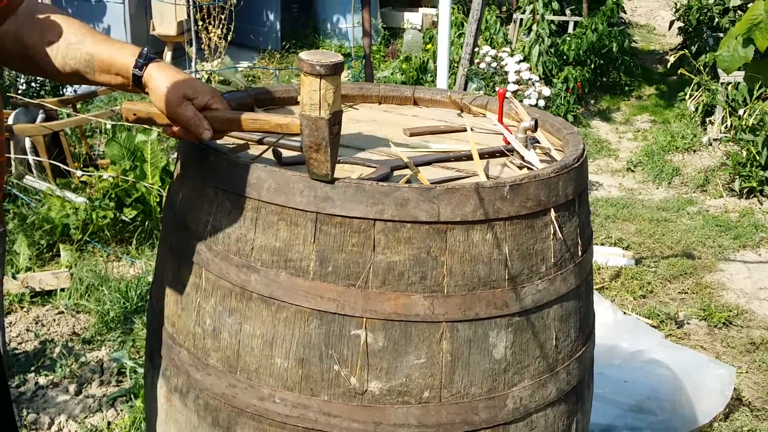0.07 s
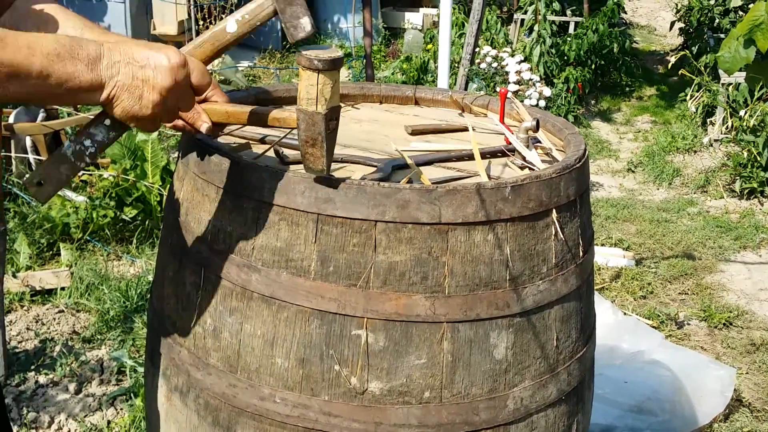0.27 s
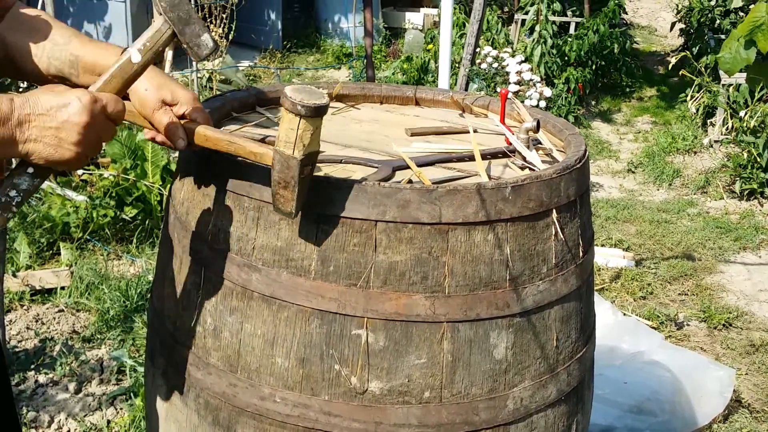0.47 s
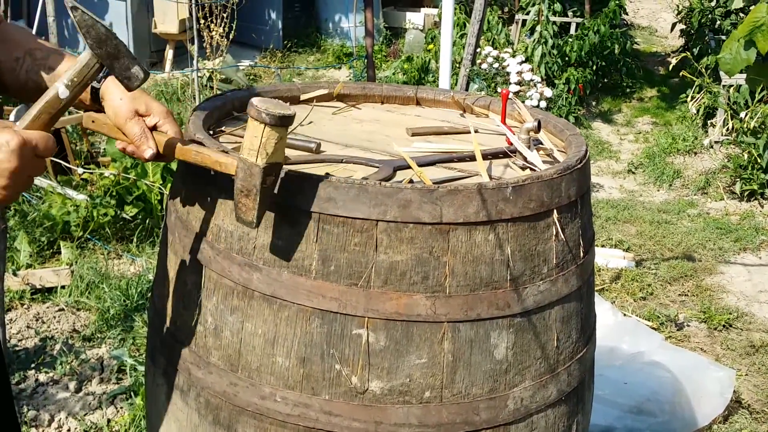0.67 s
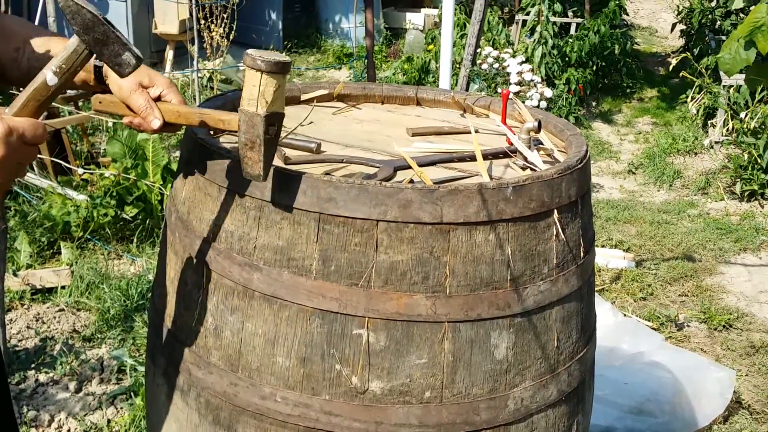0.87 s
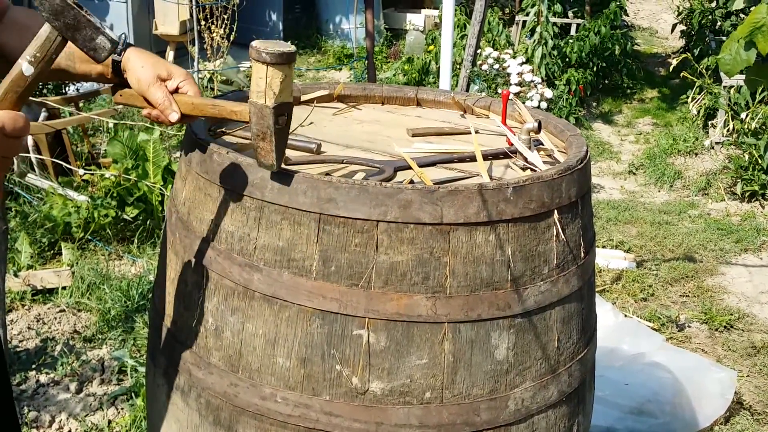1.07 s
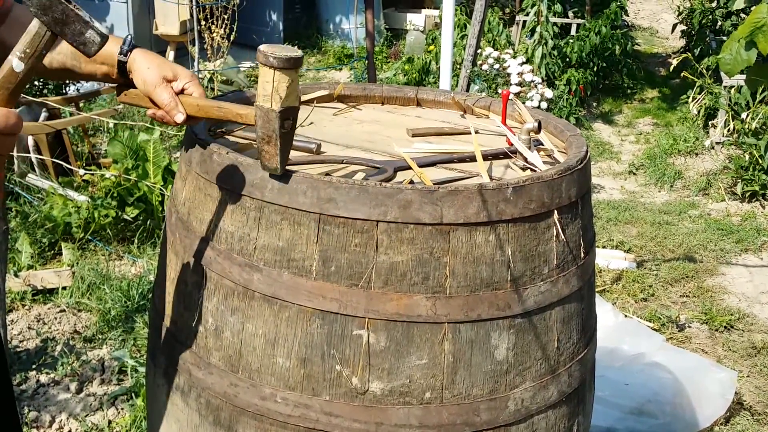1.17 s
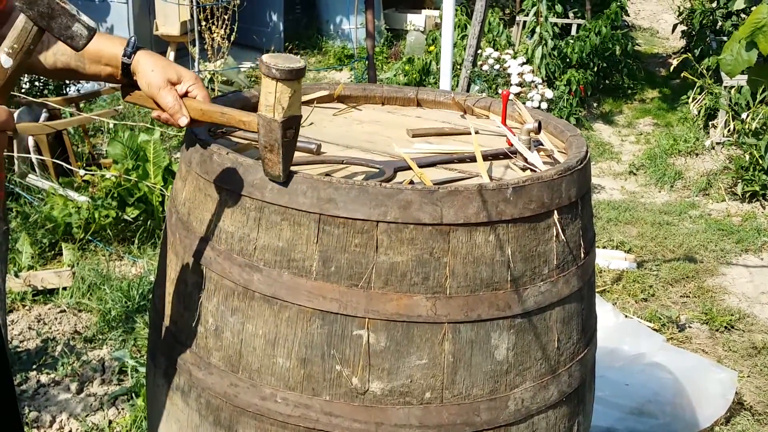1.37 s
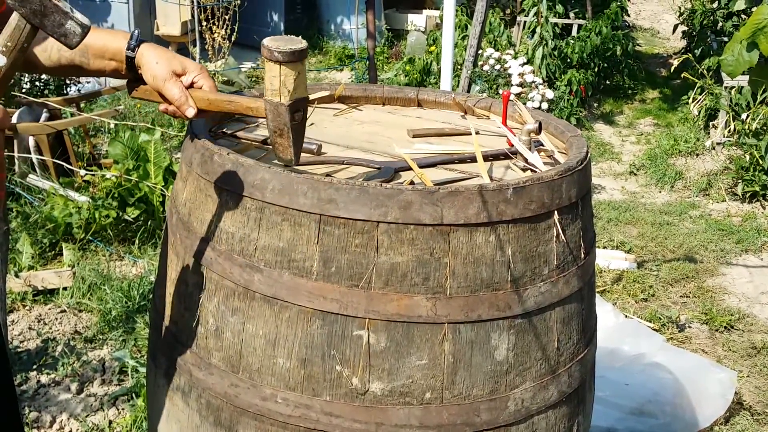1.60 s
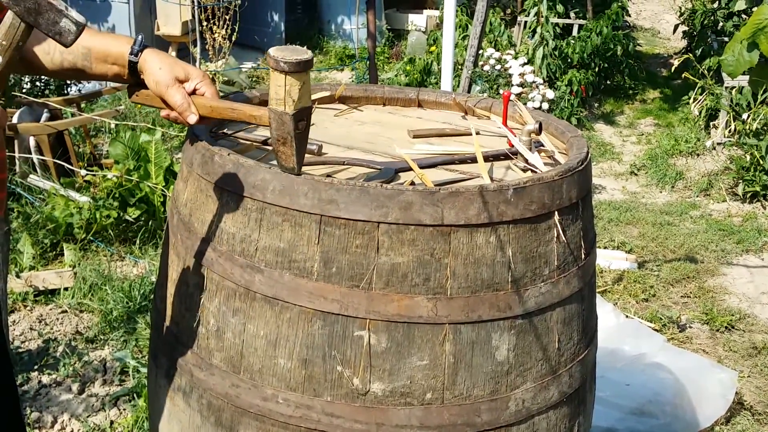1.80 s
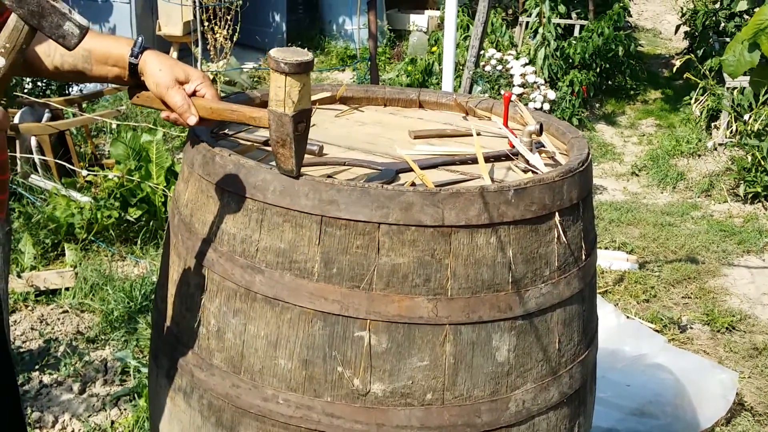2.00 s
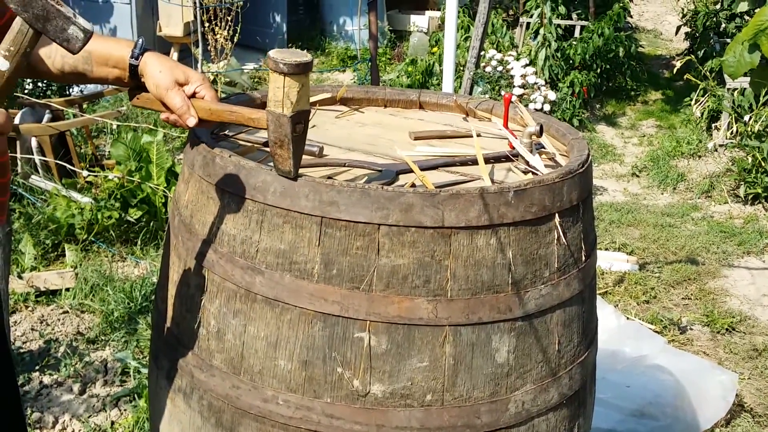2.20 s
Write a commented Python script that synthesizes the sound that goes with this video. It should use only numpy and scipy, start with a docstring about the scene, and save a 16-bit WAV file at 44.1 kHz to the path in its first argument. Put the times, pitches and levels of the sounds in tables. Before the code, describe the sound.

A hammer strikes a wooden barrel's steel hoop at about 0.25 seconds: a loud, slightly distorted crack with a hollow knock and metallic ring. A quick rattle and two soft thuds follow by 0.7 seconds. Light clinks come around 1.2 and 1.3 seconds, then dull knocks from 1.8 to 2.1. Faint garden rustle and insect hiss on the left dip after the blow and slowly return.

```python
"""A hammer drives down the steel hoop of an old wooden barrel in a garden.
One hard blow makes it rattle, then light knocks follow as the tool is set on the hoop again.
Each hit cracks, the wooden staves knock hollowly, the hoop rings on and the yard answers.
Two soft thuds follow the big blow, and insects hiss on the left throughout.
The blow overloads the recorder, which turns itself down and slowly recovers."""
import sys
import numpy as np
from scipy import signal
from scipy.fft import rfft, irfft, next_fast_len
from scipy.io import wavfile
from scipy.ndimage import minimum_filter1d, map_coordinates

SR = 44100
rng = np.random.default_rng(int(sys.argv[2]) if len(sys.argv) > 2 else 0)


def put_to_file(sound):
    """Save the sound as 16-bit audio at rate SR, in the file named by the first command-line argument."""
    columns = np.atleast_2d(sound).T  # one column per channel
    safe = np.clip(columns, -1, 1)
    whole_steps = np.round(safe * 32767)
    wavfile.write(sys.argv[1], SR, whole_steps.astype(np.int16))


N = 99225
T = np.arange(N) / SR

# Tone of the insect hiss: pitch_hz, relative_db
INSECT_TONE = [(2470, -47), (4200, -21), (5310, -10), (5800, -8), (6830, 0.5), (7170, -1), (8220, -12.5),
               (9380, -9.5), (10600, -18), (11700, -23.5), (14100, -23.5), (15500, -33)]
# How far left the insects sit: pitch_hz, left_minus_right_db
INSECT_SIDE = [(3500, 6), (5500, 16), (7000, 21.5), (10000, 10.5), (14000, 3.5)]
# Tone of the garden rustle: pitch_hz, relative_db
GARDEN_TONE = [(25, 4.5), (90, -3.5), (180, -3), (350, -0.5), (700, -7.5), (1400, -14.5), (2200, -10),
               (4000, -12.5), (9000, -23), (15000, -27.5)]
# Hits on the barrel: start_s, level_db, bass_cut_hz, treble_cut_hz,
# spot_pitch_hz, spot_boost_db, staves_db, hoop_db, yard_db
HITS = [(0.247, 15, 30, 18000, 324, 1.5, -2.5, -1, 2.5),
        (.3350, -7.5, 130, 1160, 205, 11.5, -5.5, -18, -10),
        (.4030, -14, 118.6, 1290, 191, 7.5, -6, -31, -5), (1.2285, -18.5, 110, 5100, 567, 9, -12, 1, -2.5),
        (1.2403, -21, 199, 750, 613, 17.5, -13.5, -26, -20),
        (1.317, -26, 217, 2200, 587, 9, -24, 1.5, -4.5),
        (1.3285, -26, 295, 700, 586, 14, -10.5, -16, -10.5),
        (1.7930, -24.5, 50, 516, 660, 5, -2.5, -16, -15.5),
        (1.9853, -25, 70, 355, 183, 5.5, -11.5, -8.5, -13), (2.0384, -24, 90, 1300, 647, 5, -6.5, -14, 0),
        (2.146, -42.5, 101, 774, 630, 1, -3.5, -12, -8)]
# Crack of steel on steel and wood: pitch_hz, relative_db, fade_s (time to fall 60 dB)
CRACK_BANDS = [(40, -11.5, .13), (120, -6, 0.1), (399.3, -3.5, 0.06), (930, -3.5, 0.075), (1350, 1, 0.028),
               (1700, -7, .04), (2120, -6, .035), (3530, -8, .03), (4797, -10, 0.039), (6100, -9.5, 0.024),
               (8750, -19, .025), (10300, -17.5, 0.017), (14500, -22, 0.0067)]
# Notes of the hollow wooden body: pitch_hz, level_db, fade_s
STAVE_NOTES = [(132.4, -22, 0.31), (195.27, -13, 0.23), (218, -17.5, 0.38), (250, -10, 0.11),
               (328, -2, 0.1), (373.4, -16, .24), (448.3, -16.5, .18), (566, -17, .14), (623.6, -21.5, .21),
               (658.4, -27, .42), (833, -8, 0.083), (1019, -18.5, .05), (1168, -2.5, 0.032),
               (1263.6, -10.5, 0.052), (1504, -7.5, 0.04), (2090, -17, 0.11), (2603, -24.5, 0.043)]
# Notes of the steel hoop: pitch_hz, level_db, fade_s
HOOP_NOTES = [(279.2, -40.5, 1.92), (396, -38.5, 1.85), (455.5, -56.5, 1.4), (650, -54, 1.5),
              (794, -38, 0.8), (1027, -38.5, 0.82), (1048, -48, 0.79), (1158, -39.5, .8), (1154, -43, 0.83),
              (1284, -43.5, 0.76), (1426, -45.5, 0.69), (1710, -56, .9), (2033, -48, 0.84),
              (2657, -37.5, 0.36), (3170, -38.5, 0.3), (3655, -51, 0.52)]
# Blurred ring of barrel and yard: pitch_hz, relative_db, fade_s
YARD_BANDS = [(40, -25, 0.58), (84, -16, 0.72), (196, 4, 0.59), (480, -6, .5), (700, 1.5, 0.57),
              (930, -5.5, 0.36), (1220, -3.5, .48), (1650, -9.5, .44), (2120, -10.5, .39), (3730, -17, 0.3),
              (5800, -13.5, 0.26), (8508, -21, 0.16), (10426, -21, .2), (15000, -30, 0.13)]
# Echoes from the walls: delay_s, level_db
WALL_ECHOES = [(0.057, -25.5), (.16, -42)]
# Soft low thuds: start_s, level_db
LOW_THUDS = [(0.473, -31), (0.676, -47)]
# The barrel sits a little to the right: pitch_hz, left_minus_right_db
BARREL_SIDE = [(200, -3.6), (700, -4.5), (1600, -4), (4000, -0.5), (10000, -4)]
# How alike noise is in both ears: pitch_hz, likeness (1 is the same, 0 is unrelated)
EAR_LIKENESS = [(100, 1), (700, 0.77), (1600, 0.51), (3500, 0.028), (9000, 0)]


def amp(db):
    """Turn decibels into a volume factor."""
    return 10 ** (np.asarray(db) / 20)


def along(points, hz):
    """Read a table's value at any pitch, gliding between its rows."""
    pitches, values = np.transpose(points)
    return np.interp(np.log(hz + 1), np.log(pitches + 1), values)


def filtered(x, response):
    """Scale each frequency in x by response(frequency)."""
    n = x.shape[-1]
    padded = next_fast_len(n + 8192, True)
    return irfft(rfft(x, padded) * response(np.fft.rfftfreq(padded, 1 / SR)), padded)[..., :n]


def lowpass(f, hz):
    """A filter curve that softens sound above hz."""
    return 1 / (1 + np.sqrt(2) * 1j * f / hz - (f / hz) ** 2)


def highpass(f, hz):
    """A filter curve that softens sound below hz."""
    return -(f / hz) ** 2 * lowpass(f, hz)


def delayed(x, start_s):
    """Place x at start_s in a track N samples long."""
    return np.pad(x, ((0, 0), (max(round(start_s * SR), 0), N)))[:, :N]


def panned(x, side):
    """Lean each frequency left or right, keeping the average of the two sides."""
    def gains(f):
        left_right = amp(along(side, f) * np.array([[.5], [-.5]]))
        return left_right / left_right.mean(0)
    return filtered(x, gains)


def wobble(per_s):
    """A smooth curve through per_s random values a second."""
    return map_coordinates(rng.standard_normal(int(N * per_s / SR) + 4), [T * per_s])


def noise(tone, size):
    """Stereo noise of strength 1 with the given tone; both ears get nearly the same bass."""
    def colour(f):
        spread = np.arccos(np.clip(along(EAR_LIKENESS, f), -1, 1)) / 2
        return amp(along(tone, f)) * [np.cos(spread), np.sin(spread)]
    middle, side = filtered(rng.standard_normal((2, size)), colour)
    stereo = np.array([middle + side, middle - side])
    return stereo / np.sqrt(np.mean(stereo ** 2) + 1e-20)


def dying_noise(bands, size):
    """A burst of noise in which every band fades at its own speed."""
    hz, db, fades = np.transpose(bands)
    spectrum = rfft(noise(np.c_[hz, db], size))
    f = np.fft.rfftfreq(size, 1 / SR)
    out = np.zeros((2, size))
    for one_band, fade_s in zip(np.eye(len(hz)), fades):
        band = irfft(spectrum * along(np.c_[hz, one_band], f), size)
        out += band * amp(-60 * T[:size] / fade_s)
    return out


def ring(notes):
    """A struck object sounds several pure notes, each fading away."""
    out = np.zeros((1, N))
    for hz, db, fade_s in notes:
        t = T[:int(fade_s * SR)]
        out[0, :len(t)] += amp(db - 60 * t / fade_s) * np.sin(2 * np.pi * hz * t)
    return out


def insects(level_db=-56.5, waver_db=2):
    """A chorus of insects makes a high, slightly flickering hiss on the left."""
    hiss = panned(noise(INSECT_TONE, size=N), INSECT_SIDE)
    return hiss * amp(level_db + waver_db * wobble(per_s=25))


def garden(level_db=-63.5, waver_db=5.5):
    """The garden's faint rustle swells and sinks."""
    return noise(GARDEN_TONE, size=N) * amp(level_db + waver_db * wobble(per_s=7.5))


def contact(x, bass_hz, treble_hz, spot_hz, spot_db, width_hz=97):
    """Each hit has its own bass and treble cut, and the struck spot boosts its own pitch."""
    def colour(f):
        spot = 1j * f * width_hz / (spot_hz ** 2 - f ** 2 + 1j * f * width_hz)
        return highpass(f, bass_hz) * lowpass(f, treble_hz) * (1 + (amp(spot_db) - 1) * spot)
    return filtered(x, colour)


def knocks(crack_db=-3, hit_samples=4096):
    """Every hit cracks and pushes the staves, the hoop and the yard into ringing."""
    out, pushes = np.zeros((2, N)), np.zeros((3, N))
    for start_s, db, *colour, staves_db, hoop_db, yard_db in HITS:
        crack = contact(dying_noise(CRACK_BANDS, hit_samples), *colour)
        out += delayed(amp(db + crack_db) * crack, start_s)
        push = contact(signal.unit_impulse(hit_samples), *colour)
        strengths = amp(db + np.array([[staves_db], [hoop_db], [yard_db]]))
        pushes += delayed(strengths * push, start_s)
    for push, ringing in zip(pushes, (staves(), hoop(), yard())):
        out += signal.fftconvolve(push[None], ringing, axes=1)[:, :N]  # each push starts a new ring
    return out


def staves(rise_s=.003):
    """The barrel's wooden boards give a short, hollow knock."""
    return ring(STAVE_NOTES) * (1 - np.exp(-T / rise_s))


def hoop():
    """The steel hoop rings on, with a shimmer around its main notes."""
    return ring(HOOP_NOTES) + shimmer()


def shimmer(count=44, low_hz=856, high_hz=2490, low_db=-54.5, low_fade_s=1.168, scatter_db=4):
    """The hoop's crowd of weak overtones; higher ones die sooner."""
    place, strength = rng.random((count, 2)).T
    ratio = (high_hz / low_hz) ** ((np.arange(count) + place) / count)
    db = low_db - 6 * np.log2(ratio)  # 6 dB softer per octave
    db += scatter_db * (2 * strength - 1)
    fade_s = low_fade_s / ratio ** .33
    return ring(np.c_[low_hz * ratio, db, fade_s])


def yard(level_db=-22.5, rise_s=.006, size=32768):
    """Barrel and yard answer a hit with a blurred wash of sound."""
    return amp(level_db) * dying_noise(YARD_BANDS, size) * (1 - np.exp(-T[:size] / rise_s))


def echoes(direct, treble_cut_hz=1770):
    """Nearby walls send the knocks back, later and duller."""
    dull = filtered(direct, lambda f: lowpass(f, treble_cut_hz))
    return sum(amp(db) * delayed(dull, delay_s) for delay_s, db in WALL_ECHOES)


def thuds(pitch_hz=78, peak_s=.0092):
    """Each thud is a few low waves that swell and die."""
    out = np.zeros(N)
    for start_s, db in LOW_THUDS:
        t = np.maximum(T - start_s, 0)
        swell = (t / peak_s) ** 2 * np.exp(2 - 2 * t / peak_s)
        out += amp(db) * swell * np.sin(2 * np.pi * pitch_hz * t)
    return out


def barrel(left_lead_s=.000045):
    """Knocks, echoes and thuds reach the left side first but are louder on the right."""
    direct = knocks()
    sound = direct + echoes(direct) + thuds()
    shifted = filtered(sound, lambda f: np.exp(1j * np.pi * f * left_lead_s * np.array([[1], [-1]])))
    return panned(shifted, BARREL_SIDE)


def scene():
    """The barrel in its garden."""
    return barrel() + insects() + garden()


def gain_control(x, limit_db=-11, max_cut_db=13.5, react_s=.0025, hold_s=.81, recover_s=.4):
    """A loud peak makes the recorder turn itself down, wait, then creep back up."""
    peak_db = 20 * np.log10(np.abs(x).max(0) + 1e-9)
    cut_db = np.clip(peak_db - limit_db, 0, max_cut_db)
    half = int(hold_s * SR / 2)
    # hold the deepest cut of the last hold_s seconds
    held_db = -minimum_filter1d(-cut_db, 2 * half + 1, origin=half, mode="constant")
    fade = np.exp(-T / recover_s)
    easing_db = np.maximum.accumulate(held_db / fade) * fade
    smoothing = np.exp(-1 / (react_s * SR))
    return x * amp(-signal.lfilter([1 - smoothing], [1, -smoothing], easing_db))


def record(dry, clip_level=.86, bass_cut_hz=51, treble_cut_hz=15500):
    """The recorder turns down, squashes peaks it is too slow for, and trims bass and treble."""
    lowered = gain_control(dry)
    clipped = lowered / (1 + np.abs(lowered / clip_level) ** 6) ** (1 / 6)
    thinned = filtered(clipped, lambda f: highpass(f, bass_cut_hz))
    return filtered(thinned, lambda f: 1 / (1 + (f / treble_cut_hz) ** 100))


dry = scene()
out = record(dry)
put_to_file(out)
```